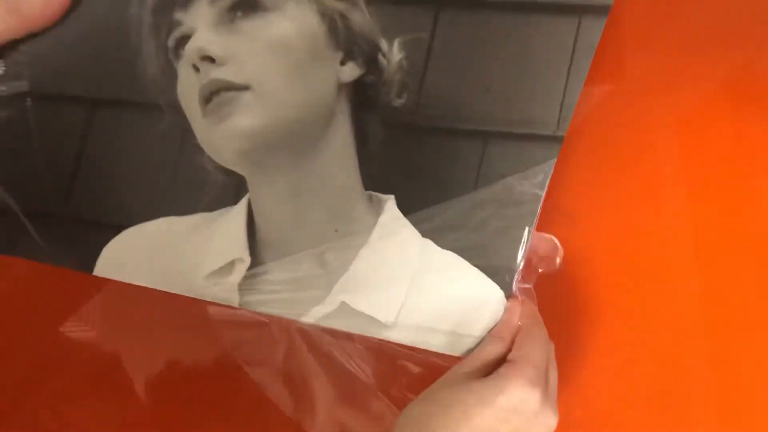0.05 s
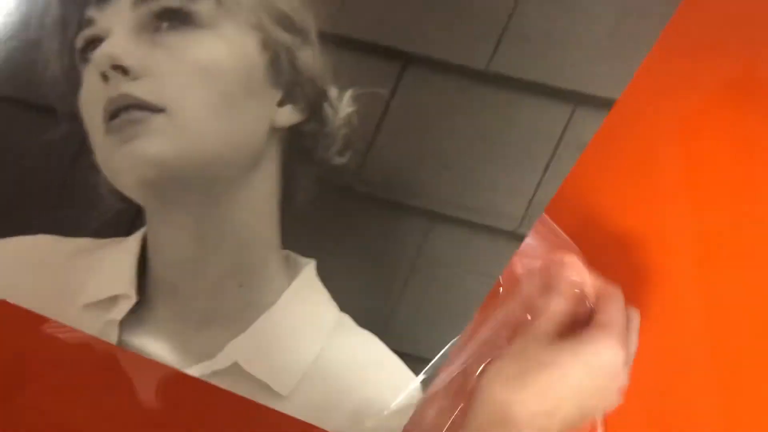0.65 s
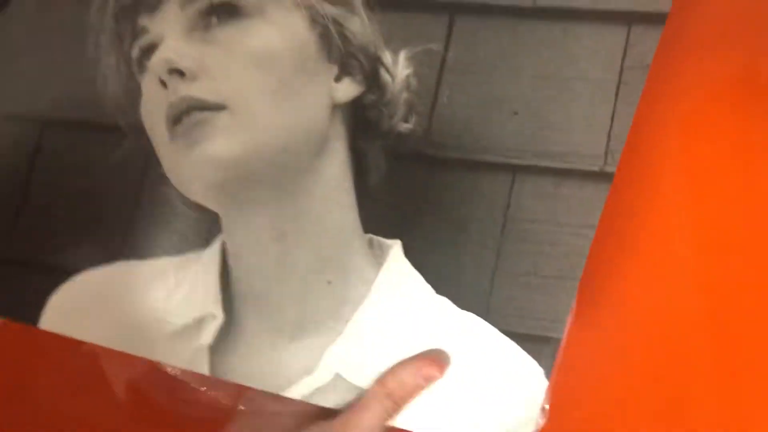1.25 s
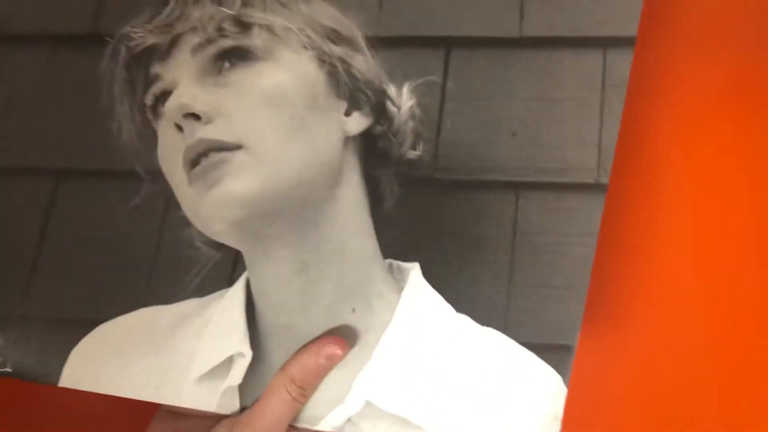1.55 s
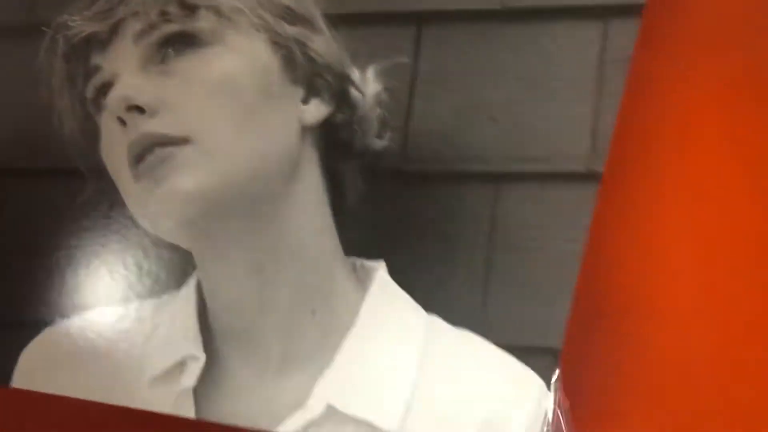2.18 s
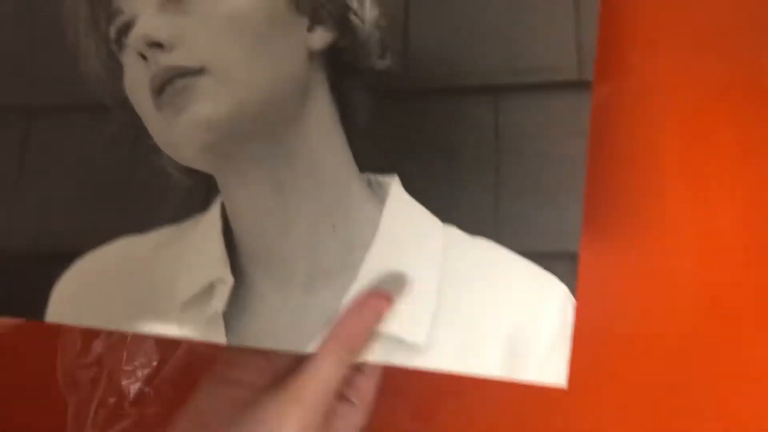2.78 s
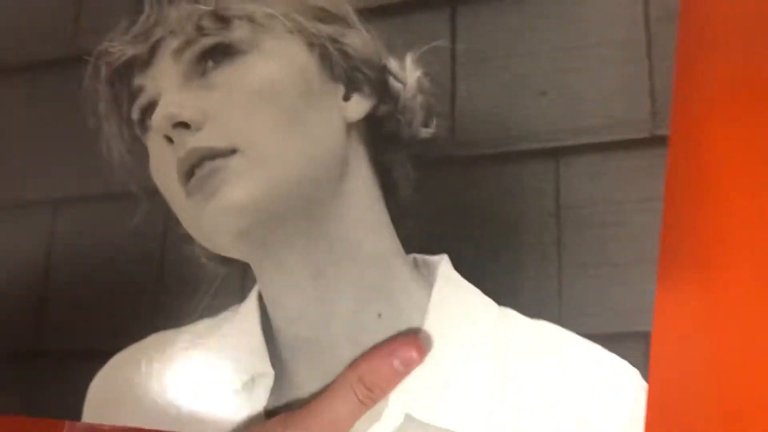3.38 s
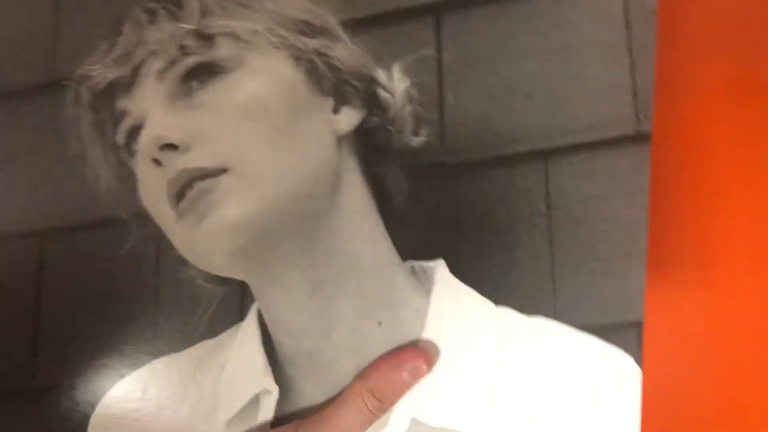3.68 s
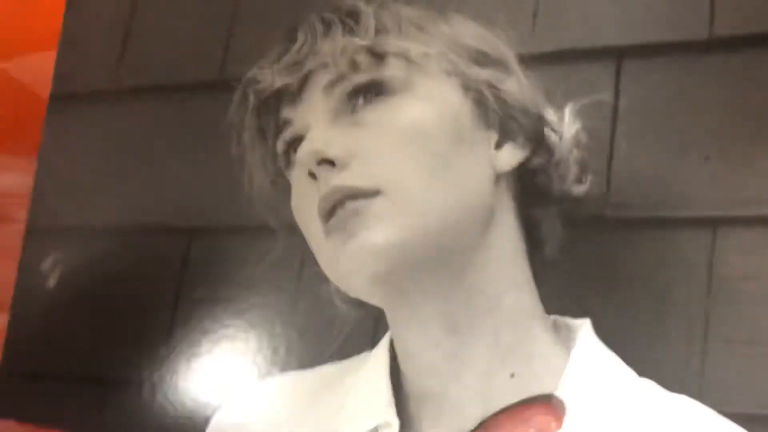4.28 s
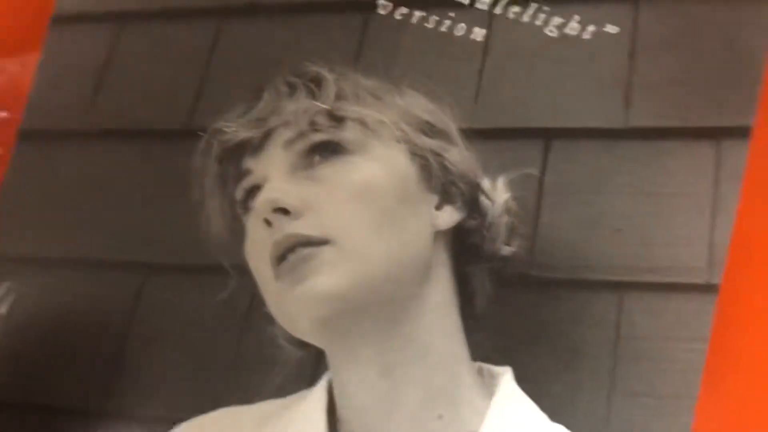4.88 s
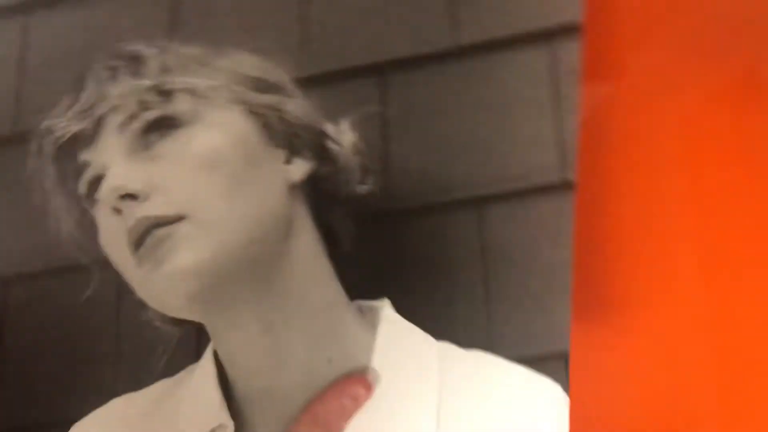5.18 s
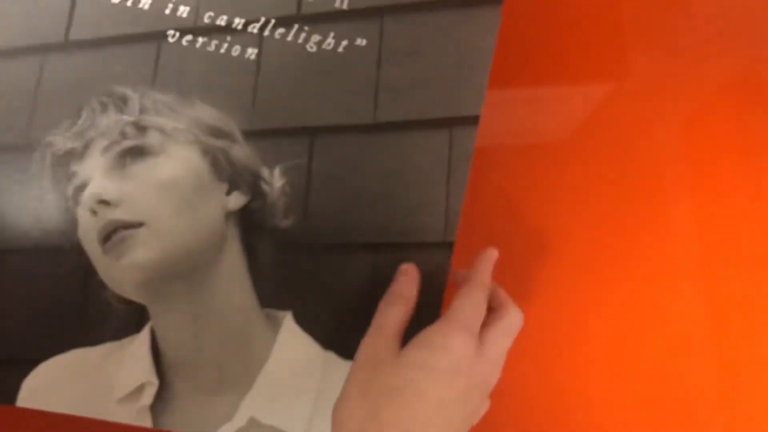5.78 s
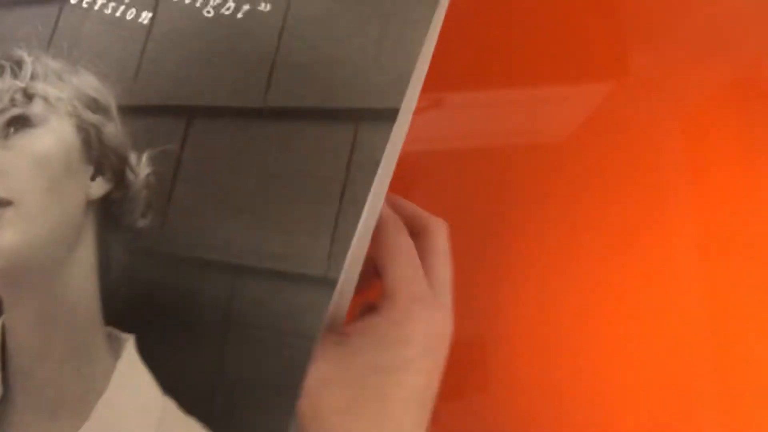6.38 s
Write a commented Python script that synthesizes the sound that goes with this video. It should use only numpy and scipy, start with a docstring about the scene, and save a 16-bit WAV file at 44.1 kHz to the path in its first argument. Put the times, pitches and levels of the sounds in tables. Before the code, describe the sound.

Thin plastic hisses and crackles in uneven strokes as a card record sleeve slides through it, with scattered crease pops and a few hollow bumps against the hand. A quick cluster of pops ends in one loud snap, after which the wrap settles. Fingertips tap the stiff card and drag along its edge with a faint ring. Everything is heard up close in a small room with a steady ventilation hum.

```python
"""A card record sleeve is drawn out of its thin plastic wrap and turned over, close to the microphone
in a small room. The wrap hisses and crinkles as the card slides through it; its creases pop, one of
them loudly. The card knocks against the hand, and fingers tick on it and rub its face and edge,
setting it ringing. Ventilation hums in the background."""
import sys
import numpy as np
from scipy import signal
from scipy.fft import rfft, irfft
from scipy.io import wavfile
from scipy.ndimage import uniform_filter1d

SR = 44100
rng = np.random.default_rng(int(sys.argv[2]) if len(sys.argv) > 2 else 0)


def transcribe(signal):
    """Save signal, clipped to [-1, 1], as a 16-bit WAV file at the path in sys.argv[1]."""
    frames = np.atleast_2d(signal).T
    limited = np.clip(frames, -1, 1)
    pcm = np.round(limited * 32767).astype(np.int16)
    wavfile.write(sys.argv[1], SR, pcm)


N = 293265
TIME = np.arange(N) / SR

# resonances of the card's face: (frequency [Hz], width [Hz], gain [dB])
FACE_RESONANCES = [(1780, 120, -3.5), (2320, 460, -1), (2450, 220, -11), (2900, 190, -10), (3920, 280, -13)]
# spectrum of skin scuffing on card: (frequency [Hz], gain [dB])
SKIN_SPECTRUM = [(150, -8), (450, 11.5), (750, 7.5), (1100, 8.5), (2000, 14), (3200, 7), (5500, -2),
                 (9000, -33), (16000, -43)]


def sliding(brush_gain):
    """Close up, the wrap hisses and crinkles over the card; with more pressure the card scrapes too."""
    # pulls on the card: (start [s], rise [s], hold [s], level [dB], weight of the duller scrape [dB])
    pulls = [(0, 0.0029, .005, -54.5, -0.5), (.085, 0.037, .02, -49.5, -4), (.142, 0.031, 0.02, -42.5, 3.5),
             (.25, 0.091, 0.043, -39.5, 0), (.4, .05, 0.054, -43.5, -3.5), (.57, 0.031, 0.011, -41.5, -4.5),
             (.868, 0.011, 0.13, -42.5, -4.5), (1.07, .13, 0.097, -44.5, -4),
             (1.36, 0.073, 0.0043, -47, -3), (1.59, 0.018, 0.14, -50, -1), (1.72, 0.057, 0.044, -47, -4.5),
             (1.925, 0.042, .015, -49, -6), (2.025, 0.059, 0.085, -50, -1), (2.17, 0.11, .01, -44, -2.5),
             (2.36, 0.031, 0.065, -48, -3), (2.7, 0.021, 0.018, -58, 8.5), (2.76, 0.12, 0.089, -44, -0.5),
             (3.226, 0.026, 0.065, -47, 3.5), (3.34, 0.042, 0.0081, -46.5, 3), (3.55, 0.046, 0.46, -55, -1),
             (4.17, 0.059, 0.0064, -44.5, -7), (4.42, 0.1, .09, -49.5, -4.5)]
    # the wrap never lies quite still, least of all with the card inside: (time [s], level [dB])
    stir_levels = [(0, -60), (1.5, -55.5), (2.65, -65.5), (3.15, -78.5), (4.4, -62), (4.85, -71),
                   (5.7, -76.5), (6.65, -82)]
    # spectra of the hissing wrap and the scraping card: (frequency [Hz], gain [dB])
    wrap_spectrum = [(200, -56), (900, -5), (2300, -1), (3500, 0.5), (5000, 2), (8000, 0), (12000, -2),
                     (16000, -2)]
    scrape_spectrum = [(120, -23), (300, -5), (480, -2.5), (720, -7), (1050, -5), (1700, -5.5), (2500, -7),
                       (3600, -10), (6000, -27.5), (16000, -16)]
    pull, scrape = strokes(pulls, release_db_per_s=120)  # the card coasts to rest
    stir = amp(np.interp(TIME, *np.transpose(stir_levels)))
    hiss = friction(slips_per_s=2500, spread_db=1.5, grain_db=-7, judder_db=1.5)
    wrap = flex(colour(hiss, wrap_spectrum), depth_db=1.8, span_s=0.05, span_hz=500)
    clicks = crackle(20 * np.log10(np.hypot(pull, stir)), pops_per_s=230, spread_db=5.5, follow=0.73)
    wrinkle = pop(buckle_s=0.00052, shiver_db=-7.5, shiver_s=0.0018)
    crinkle = signal.oaconvolve(colour(clicks, wrap_spectrum), wrinkle)[:N]
    drag = friction(slips_per_s=900, spread_db=3.5, grain_db=-4, judder_db=3)
    card = flex(colour(drag, scrape_spectrum), depth_db=3.5, span_s=0.04, span_hz=400)
    wrap_gain = np.linalg.norm([pull, stir, brush_gain], axis=0)
    card_gain = np.hypot(scrape, stir)
    return amp(0.24) * wrap * wrap_gain + amp(-25) * crinkle + amp(-2) * card * card_gain


def strokes(rows, release_db_per_s, sag_db_per_s=18.5):
    """Strokes gather speed, slacken and die away. Returns their gain, plain and weighted."""
    start, rise, hold, db, weight_db = np.transpose(rows)[:, :, None]
    coarse_time = TIME[::32]
    t = coarse_time - start
    sag_db = sag_db_per_s * np.clip(t - rise, 0, hold)
    release_db = release_db_per_s * np.maximum(t - rise - hold, 0)
    plain = np.clip(t / rise, 0, 1) * amp(db - sag_db - release_db)
    weighted = plain * amp(weight_db)
    return [np.interp(TIME, coarse_time, np.linalg.norm(gains, axis=0)) for gains in (plain, weighted)]


def friction(slips_per_s, spread_db, grain_db, judder_db):
    """Countless tiny slips merge into hiss, larger ones stand out, and both come in clumps."""
    sizes = amp(spread_db * np.minimum(rng.exponential(1, N), 5))
    slips = sizes * rng.choice([-1, 1], N) * (rng.random(N) < slips_per_s / SR)
    grainy_hiss = rng.standard_normal(N) + amp(grain_db) * unit(slips)
    return unit(grainy_hiss * amp(judder_db * drift(rate_hz=70)))


def flex(x, depth_db, span_s, span_hz, size=256):
    """A bending sheet radiates in patches of frequency that keep shifting."""
    spectra = signal.stft(x, nperseg=size)[2]
    patches = rng.standard_normal(spectra.shape)
    patches = uniform_filter1d(patches, max(1, round(span_hz * size / SR)), axis=0)
    patches = uniform_filter1d(patches, max(1, round(span_s * 2 * SR / size)), axis=1)
    return unit(signal.istft(spectra * amp(depth_db * unit(patches)), nperseg=size)[1][:N])


def crackle(speed_db, pops_per_s, spread_db, follow):
    """Wrinkles pop more often as the wrap moves faster; their size grows more slowly than their rate."""
    pace = amp(follow * (speed_db - speed_db.max()))
    sizes = amp(spread_db * rng.uniform(-2, 1, N)) * rng.choice([-1, 1], N)
    return sizes * np.sqrt(pace) * (rng.random(N) < pace * pops_per_s / SR)


def pop(buckle_s, shiver_db, shiver_s, size=4096):
    """A sheet buckles, each frequency leaving it at a slightly different moment, then shivers briefly."""
    t, hz = np.arange(size) / SR, np.fft.rfftfreq(size, 1 / SR)
    delay_s = buckle_s * np.interp(hz, np.linspace(0, SR / 2, 14), rng.random(14)) + 4 / SR
    buckle = irfft(np.exp(-2j * np.pi * np.cumsum(delay_s) * SR / size), size)
    shiver = rng.standard_normal(size) * np.exp(-t / shiver_s)
    return (buckle + amp(shiver_db) * shiver / np.linalg.norm(shiver)) * np.linspace(1, 0, size)


def snaps(wet_db=-3.5):
    """Creases of the wrap flip over, each with its own brightness and its own room reflections."""
    # the louder creases popping: (time [s], energy [dB], brightness [dB/octave])
    creases = [(.103, -22, 0), (0.1173, -18.5, -2), (.156, -13, -3.5), (.5206, -16, 10), (.611, -10, 3),
               (.8474, -9, 5), (.882, -15, -2.5), (1.599, -18, -5), (2.1033, -19, 0), (2.31, -12.5, 0.5),
               (2.965, -14, 6), (3.4515, -25, 1), (3.5117, -22, 6), (3.8808, -21, 2.5), (3.9013, -17, 2),
               (3.9146, -6.5, -0.5), (3.978, -5, 6.5), (3.9825, -11.5, -2), (3.986, 7.5, -1.5),
               (4.037, -12, -5), (4.1647, -20, -2), (4.559, -15.5, 1), (4.727, -29, -1), (4.839, -29, 1),
               (5.9325, -23.5, -7)]
    # spectrum of a popping crease: (frequency [Hz], gain [dB])
    crease_spectrum = [(150, -27), (400, -6.5), (750, -15.5), (1300, -1.5), (1900, 0), (2450, 4),
                       (3200, 2.5), (5000, 1), (8000, 1.5), (11000, 1.5), (16000, 0.5)]
    out = np.zeros(N)
    for s, db, bright_db in creases:
        pop_in_room = amp(wet_db) * room_tail()
        add(pop_in_room, 0, pop(buckle_s=0.001227, shiver_db=-3.5, shiver_s=0.011))
        tilted = [(hz, level + bright_db * np.log2(hz)) for hz, level in crease_spectrum]
        sound = colour(pop_in_room, tilted)
        add(out, s, amp(db) * sound / np.linalg.norm(sound))
    return out


def knocks(travel_s=0.002, size=8192):
    """Blows ring the modes of the hollow sleeve; low bending waves travel slower and arrive later."""
    # the sleeve bumping against the hand: (time [s], peak [dB], hardness [dB/octave])
    bumps = [(0.158, -39, 13), (.317, -32, 6.5), (1.6043, -22.5, 2.5), (2.939, -35.5, -6), (2.966, -34, 4),
             (3.25, -32, -8), (3.342, -36, 3), (3.428, -39, 7), (3.948, -34.5, 9), (3.989, -29.5, 3),
             (5.19, -38.5, 2)]
    # ringing of the sleeve: (frequency [Hz], level [dB], t60 [s])
    sleeve_modes = [(261, -10.5, 0.024), (328, -0.5, 0.05), (366, -2.5, 0.065), (469, -8, 0.056),
                    (806, -10, 0.031), (957, -10.5, 0.023), (1125, -17, 0.016)]
    hz, mode_db, t60 = np.transpose(sleeve_modes)[:, :, None]
    t = np.maximum(np.arange(size) / SR - travel_s * np.sqrt(hz[0] / hz), 0)
    detunes = rng.normal(1, 0.026, (len(bumps), len(sleeve_modes), 1))
    low_cut = signal.butter(2, 200, "high", fs=SR, output="sos")  # the knocks carry little below 200 Hz
    out = np.zeros(N)
    for (s, db, hard_db), detune in zip(bumps, detunes):
        envelopes = amp(mode_db + hard_db * np.log2(hz) - 60 * t / t60)
        modes = envelopes * np.sin(2 * np.pi * hz * detune * t)
        sound = signal.sosfilt(low_cut, modes.sum(0))
        add(out, s, amp(db) * sound / abs(sound).max())
    return out


def ticks():
    """Fingertips catch on the stiff card: its face rings, and the skin adds a broad scuff."""
    # fingertip catches: (time [s], energy [dB], weight of the scuff [dB])
    catches = [(0.1524, -23, -2), (.216, -21, 6), (1.058, -20.5, -1), (1.5927, -27.5, -7), (1.605, -11, 1),
               (3.172, -31.5, -8), (3.247, -22, -7), (3.295, -18, 1), (3.5131, -26, 1.5), (5.105, -24.5, 0),
               (5.131, -23, 0), (5.1547, -16.5, -4.5), (5.19, -23, 6)]
    out = np.zeros(N)
    for s, db, skin_db in catches:
        face = ring(pop(buckle_s=0.00103, shiver_db=-19, shiver_s=0.0033), FACE_RESONANCES)
        scuff = colour(pop(buckle_s=0.0013, shiver_db=3, shiver_s=0.0011), SKIN_SPECTRUM)
        sound = unit(face) + amp(skin_db) * unit(scuff)
        add(out, s, amp(db) * sound / np.linalg.norm(sound))
    return out


def finger_rubs():
    """Fingers shift on the face and drag along the edge. Returns their sound and the brushed wrap's gain."""
    # rubs: (start [s], rise [s], hold [s], level [dB], weight of the wrap brushing along [dB])
    face_rubs = [(5.095, 0.015, .006, -49.5, -11), (5.165, 0.033, .005, -52, -4.5),
                 (5.205, 0.036, 0.032, -52, -1)]
    edge_rubs = [(3.32, 0.059, 0.028, -49, -2.5), (5.57, 0.037, .01, -63, -10),
                 (5.68, 0.036, 0.052, -59, -9), (6.01, 0.03, 0.028, -53.5, -15),
                 (6.165, 0.047, .01, -49.5, -7), (6.21, 0.062, 0.042, -43.5, -11.5),
                 (6.35, 0.019, .01, -54, -19), (6.44, .04, 0.049, -67, -13), (6.62, .025, .01, -54.5, -19)]
    # resonances of the card rubbed on its edge: (frequency [Hz], width [Hz], gain [dB])
    edge_resonances = [(460, 42, -0.5), (866, 93, -4), (1030, 190, -0.5), (1246, 110, -1.5), (1650, 73, 3),
                       (2070, 140, -21), (3800, 300, -18)]
    face_gain, face_brush = strokes(face_rubs, release_db_per_s=450)
    edge_gain, edge_brush = strokes(edge_rubs, release_db_per_s=187)
    face = face_gain * skin_on_card(FACE_RESONANCES, skin_db=-17)
    edge = edge_gain * skin_on_card(edge_resonances, skin_db=-1.5)
    return face + edge, face_brush + edge_brush


def skin_on_card(modes, skin_db):
    """Skin sticks and slips on the card and sets its resonances going, over its own soft hiss."""
    drive = friction(slips_per_s=340, spread_db=5, grain_db=-0.5, judder_db=3.5)
    skin = colour(rng.standard_normal(N), SKIN_SPECTRUM)
    return unit(unit(ring(drive, modes)) + amp(skin_db) * unit(skin))


def ring(drive, modes):
    """The card's resonances answer a drive in parallel, with alternating signs."""
    return sum((-1) ** k * amp(db) * signal.lfilter(*signal.iirpeak(hz, hz / width, SR), drive)
               for k, (hz, width, db) in enumerate(modes))


def room(x, wet_db):
    """The close microphone hears the direct sound, then weaker reflections from the walls."""
    return x + amp(wet_db) * signal.fftconvolve(x, room_tail())[:N]


def room_tail(size=22016):
    """The small room's answer to a click, of energy 1: dense reflections whose treble dies first."""
    # decay of the room: (frequency [Hz], t60 [s])
    decay_times = [(200, 0.39), (1000, 0.58), (3000, 0.42), (8000, 0.38), (15000, 0.26)]
    hz, t, spectra = signal.stft(rng.standard_normal(size), SR, nperseg=256)
    decay = amp(-60 * t / read(decay_times, hz)[:, None])
    echoes = signal.istft(spectra * decay, SR, nperseg=256)[1][:size]
    echoes *= np.minimum(TIME[:size] / 0.0013, 1)
    return echoes / np.linalg.norm(echoes)


def ventilation():
    """Room tone: a low rumble of moving air with a few wavering tones."""
    # spectrum of the moving air: (frequency [Hz], gain [dB])
    air_spectrum = [(20, -52), (31, -33), (46, -8.5), (62, -2.5), (78, 2), (105, -14.5), (180, -10.5),
                    (215, -20), (265, -19), (410, -28), (1000, -36), (2000, -40), (5000, -53.5),
                    (14000, -65)]
    # tones of the ventilation: (frequency [Hz], rms level [dB])
    hum_tones = [(75.4, -50.5), (135, -55.5), (188, -64), (259, -64.5), (324, -76.5), (373, -73),
                 (527, -76)]
    air_gain = amp(read(air_spectrum, np.fft.rfftfreq(N, 1 / SR)))
    air = irfft(rfft(rng.standard_normal(N)) * air_gain, N)
    hum = sum(amp(db) * np.sqrt(2) * np.sin(2 * np.pi * hz * TIME + 1.52 * drift(rate_hz=4.35))
              for hz, db in hum_tones)
    return amp(-43) * unit(air) + hum


def colour(x, spectrum, size=4096):
    """Causal filter with the given spectrum, so that clicks keep their sharp fronts."""
    log_gain = np.log(amp(read(spectrum, abs(np.fft.fftfreq(size, 1 / SR)))))
    taps = np.fft.ifft(np.exp(np.conj(signal.hilbert(log_gain)))).real
    return signal.oaconvolve(x, taps[:size // 2])[:len(x)]


def drift(rate_hz):
    """Random wander of rms 1, mostly slower than rate_hz."""
    hz = np.fft.rfftfreq(N, 1 / SR)
    return unit(irfft(rfft(rng.standard_normal(N)) / (1 + (hz / rate_hz) ** 4), N))


def amp(db):
    """Decibels to gain."""
    return 10 ** (np.asarray(db) / 20)


def unit(x):
    """Scales to rms 1."""
    return x / np.sqrt(np.mean(x ** 2) + 1e-20)


def read(points, hz):
    """Reads a table on a log-frequency axis."""
    point_hz, value = np.transpose(points)
    return np.interp(np.log(hz + 1), np.log(point_hz + 1), value)


def add(mix, s, sound):
    """Mixes a sound in at s seconds."""
    part = mix[round(s * SR):][:len(sound)]
    part += sound[:len(part)]


def scene():
    """Wrap, card and fingers close to one microphone, with the room and its hum behind them."""
    fingers, brush_gain = finger_rubs()
    rubs = room(sliding(brush_gain) + fingers, wet_db=-10)
    taps = room(ticks() + knocks(), wet_db=-6)
    return (rubs + taps + snaps() + ventilation())[None]


def record(dry):
    """The recorder passes nothing above about 16 kHz."""
    low_pass = signal.firwin(511, 16000, window=("kaiser", 9), fs=SR)
    return signal.oaconvolve(dry, low_pass[None], "same")


dry = scene()
out = record(dry)
transcribe(out)
```